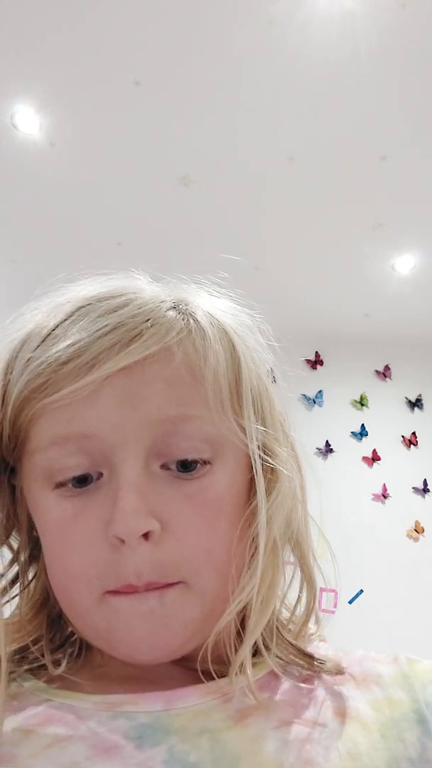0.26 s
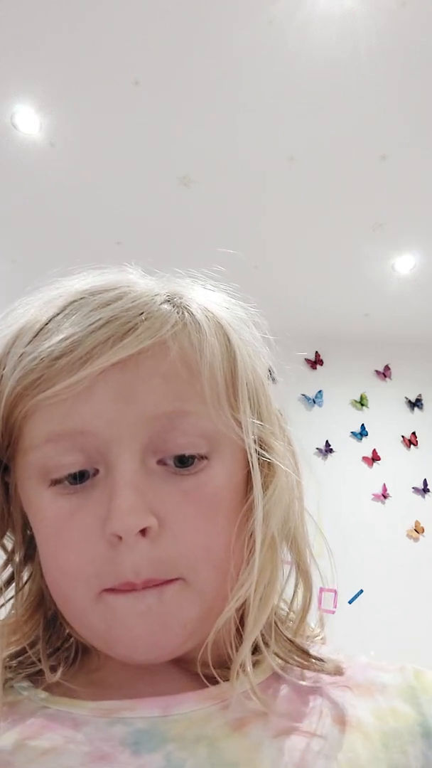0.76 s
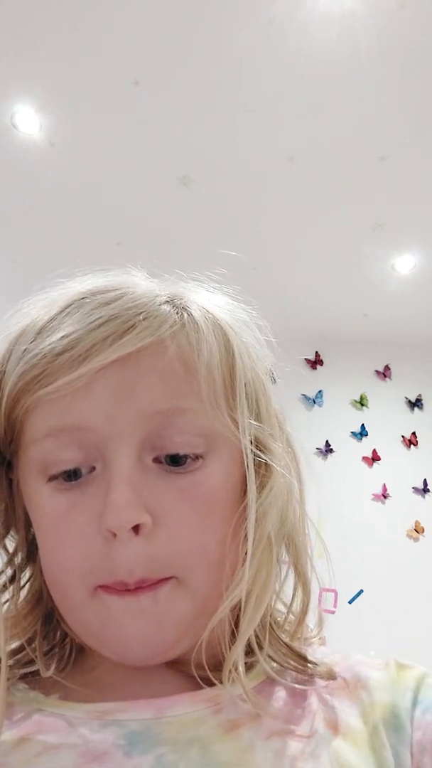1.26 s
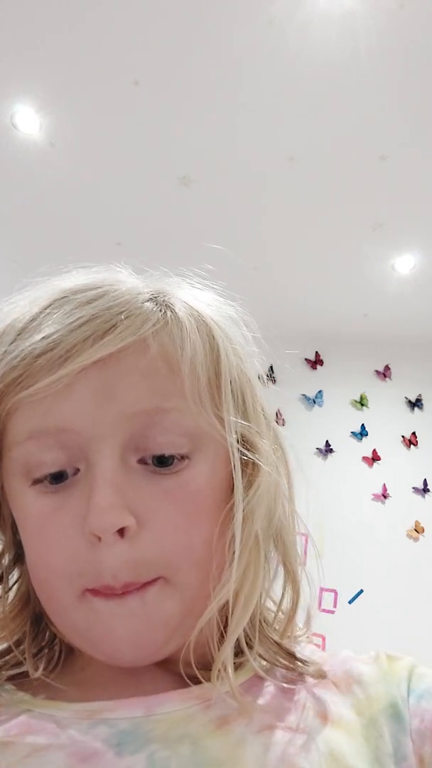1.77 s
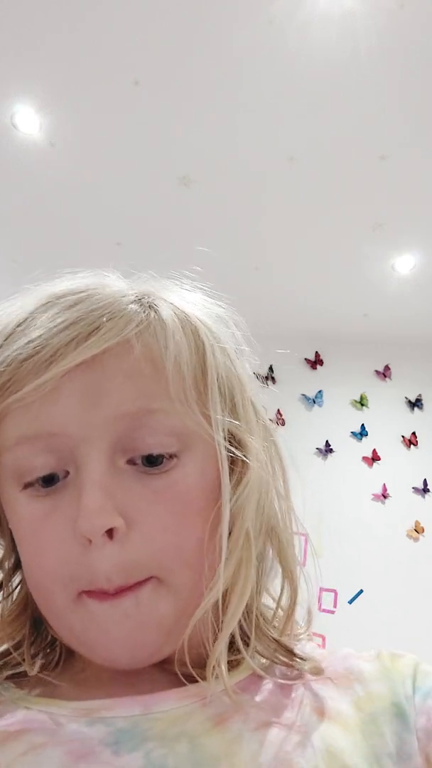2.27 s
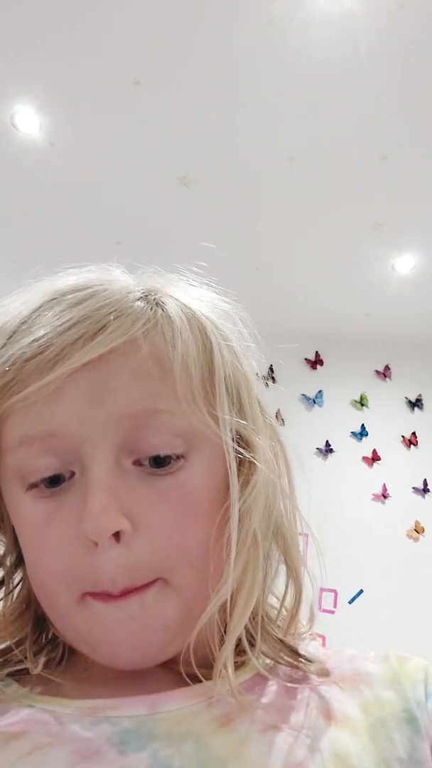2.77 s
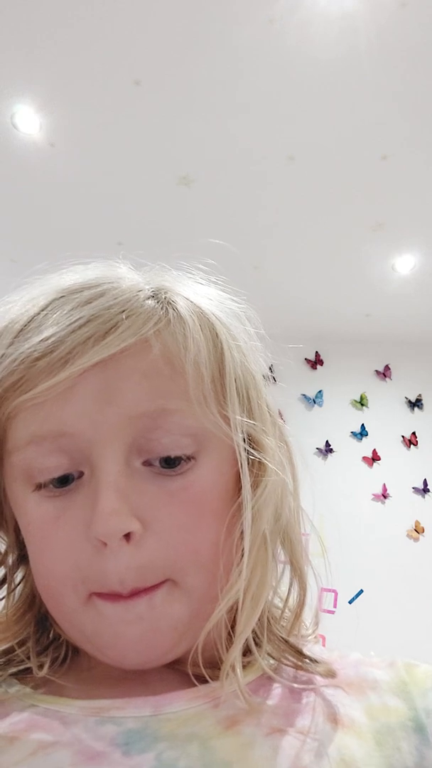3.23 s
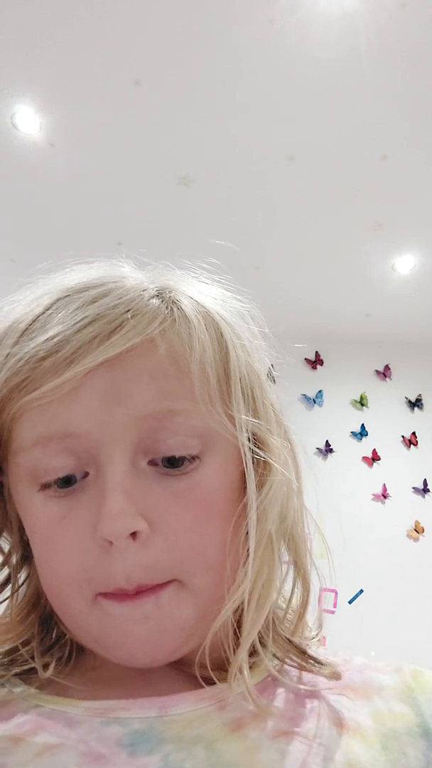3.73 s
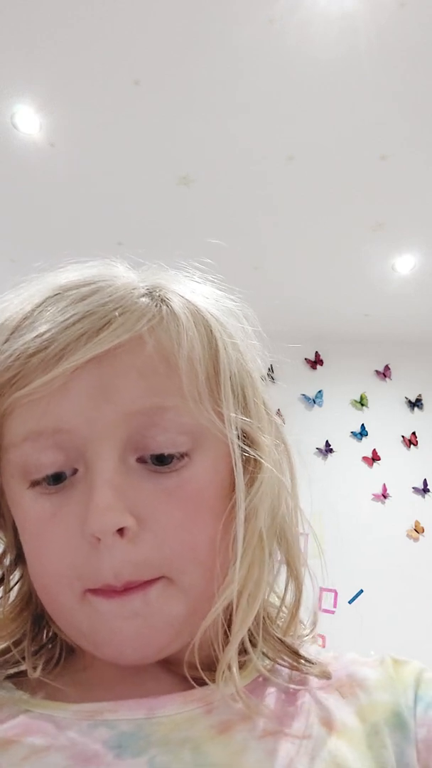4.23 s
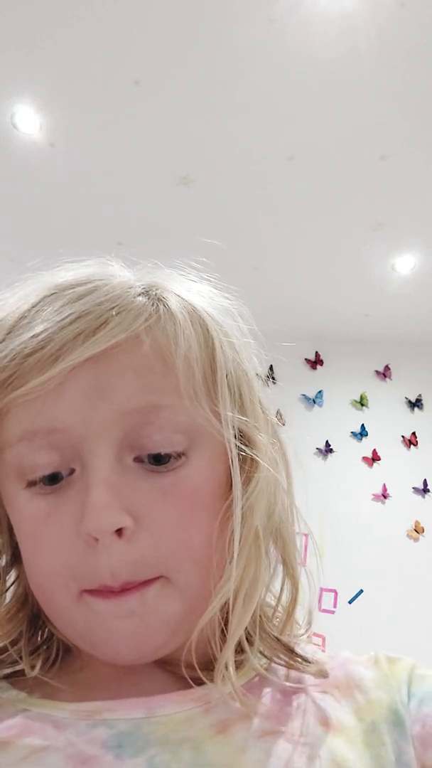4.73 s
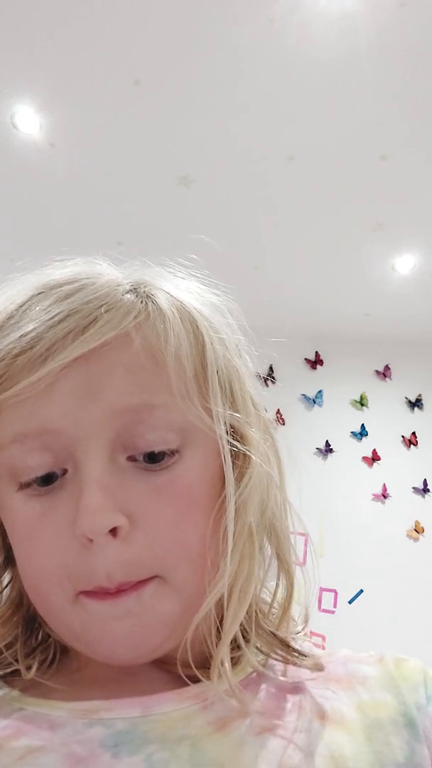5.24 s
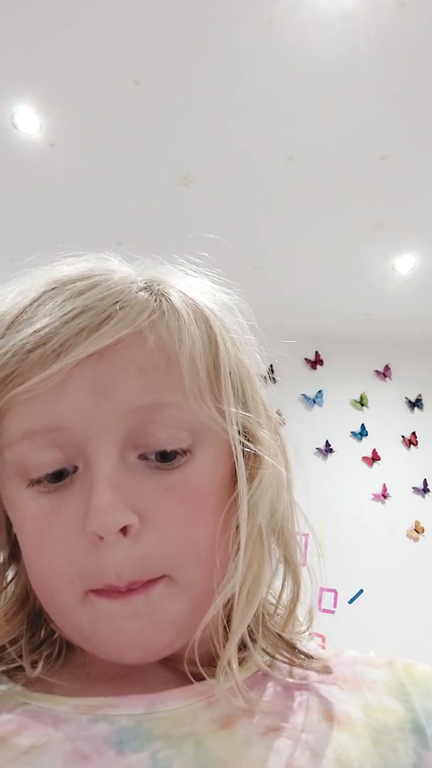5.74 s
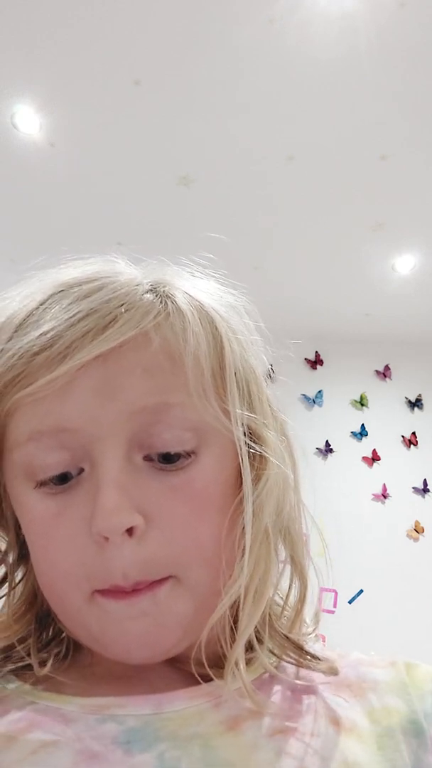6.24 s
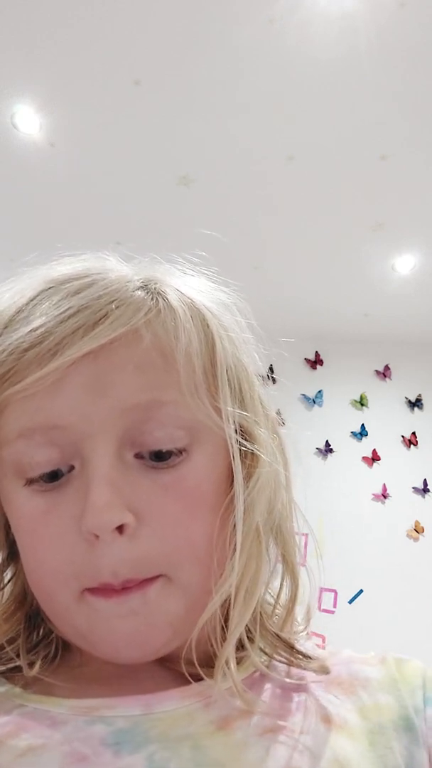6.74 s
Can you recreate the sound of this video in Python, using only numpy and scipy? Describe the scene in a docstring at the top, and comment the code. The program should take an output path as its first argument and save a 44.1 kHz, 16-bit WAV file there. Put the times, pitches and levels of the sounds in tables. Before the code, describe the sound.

Irregular rapid plastic clicks and knocks on a tabletop, strong ones roughly every half second with softer taps between, recorded very close indoors.

```python
"""Fingers rustle over a faint room tone, then small plastic toys are tapped and pressed on a table top,
close to the right port of a phone in a quiet room; the left port hears the taps later and shaded.
Each contact snaps and briefly rings the hollow shell (fading sine waves) and leaves a rattle and
some thin treble (fading noise). The table answers with a dull thud of low fading sine waves.
The rustle is swells of noise, and the room tone is steady noise."""
import sys
import numpy as np
from scipy import signal
from scipy.fft import rfft, irfft, next_fast_len
from scipy.io import wavfile
from scipy.ndimage import uniform_filter1d

SR = 44100
rng = np.random.default_rng(int(sys.argv[2]) if len(sys.argv) > 2 else 0)


def wav_record(signal):
    """Record a signal, one row per channel, as 16-bit PCM in the file named by sys.argv[1]."""
    frames = np.transpose(np.atleast_2d(signal))
    bounded = np.clip(frames, -1, 1)
    # unit amplitude maps onto the largest positive 16-bit level
    quanta = np.round(bounded * 32767).astype(np.int16)
    wavfile.write(sys.argv[1], SR, quanta)


def field_ratio(decibels):
    """Amplitude ratio for a level in dB (20 dB per decade); scalars and array-likes work."""
    return 10 ** (np.asarray(decibels, dtype=float) / 20)


N = 308700  # length of the scene in samples (7 s)

# contacts of finger, toy and table, with levels before each sound's own settings:
# start_s, snap_level_db, shell_ring_level_db, shell_pitch_hz, table_panel_level_db, table_boom_level_db
CONTACTS = [(.0231, -40.5, -40, 480, -47, -52), (0.2109, -50, -40.5, 625, -29, -31),
            (.2678, -40, -47, 1100, -45, -45), (.2712, -10.5, -11, 1150, -20, -23),
            (.435, -72, -53, 500, -53, -56), (0.7876, -32, -18.5, 450, -17, -24),
            (0.813, -18, -7, 983, -35, -35), (0.8182, -3, -5.5, 1012, -19, -21),
            (.945, -70, -52, 500, -41.5, -54), (1.229, -67, -35, 435, -42, -49),
            (1.2664, -70, -37.5, 690, -50, -55), (1.3165, -70.5, -38.5, 449, -37, -48),
            (1.3577, -44.5, -29.5, 465, -26, -23), (1.3795, -51, -21, 554, -32, -35),
            (1.4011, -4, -9, 1239, -18, -27), (1.538, -52, -36, 950, -32, -44),
            (1.719, -55, -24.5, 454, -35, -35), (1.7244, -30, -19, 1107, -17, -18),
            (1.7408, -58.5, -17, 446, -29.5, -37), (1.9414, -43, -36, 470, -38, -46),
            (1.97, -71, -51.5, 500, -37.5, -45), (2.0475, -79, -45.5, 611, -45.5, -47),
            (2.0885, -42, -24.5, 1097, -40.5, -45), (2.0955, -33.5, -13.5, 785, -15, -20),
            (2.1205, -4, -7, 1298, -14, -27), (2.198, -60, -42, 1107, -37, -51),
            (2.2475, -30, -27, 1116, -27, -36), (2.284, -70, -50, 500, -37, -39),
            (2.314, -62, -39.5, 987, -34, -54), (2.4105, -43.5, -30, 455.5, -40, -38.5),
            (2.4166, -36.5, -12, 454, -21, -21), (2.4467, -47.5, -18, 797, -32, -32),
            (2.4626, -6.5, -7.5, 1212, -11, -22), (2.6113, -52.5, -35, 733, -39, -45),
            (2.66, -72, -49, 450, -34, -45), (2.775, -64.5, -37.5, 746, -40, -40),
            (2.7902, -66.5, -34, 540, -23, -29), (2.8303, -66, -37.5, 802, -28, -30),
            (2.845, -75, -50, 500, -30, -32), (2.8834, -73.5, -37, 803, -29.5, -41),
            (2.917, -12, -5.5, 1090, -7, -11), (3.0383, -46.5, -33, 467, -36, -42),
            (3.2191, -45, -40, 603, -45, -44), (3.233, -61, -35.5, 506, -27, -31),
            (3.2699, -40, -41.5, 537, -38, -34.5), (3.2821, -9, -7.5, 763, -24, -23),
            (3.4333, -62.5, -44, 615, -49, -51), (3.462, -49, -47.5, 680, -65, -59),
            (3.5857, -60, -34.5, 650, -26, -26), (3.625, -40.5, -34, 440, -31, -17),
            (3.6401, -11.5, -7.5, 1009, -32, -30), (3.7846, -58, -37.5, 604, -39, -41),
            (4.122, -30, -31.5, 456, -36, -40), (4.13, -55, -19.5, 444, -19, -25),
            (4.1523, -6.5, -5, 1065, -18, -22), (4.17, -73, -38, 502, -14, -28),
            (4.259, -39, -28.5, 621, -34, -50), (4.295, -70.5, -54, 500, -39.5, -48),
            (4.4306, -50, -34, 915, -39, -45), (4.4369, -36, -8.5, 692, -21, -26),
            (4.462, -70, -43, 504, -12, -32), (4.6221, -42.5, -36, 450, -44.5, -50),
            (4.6379, -57.5, -25.5, 746, -28.5, -34), (4.672, -53, -39, 593, -40, -45),
            (4.7211, -33.5, -39, 590, -40, -45), (4.73, -38.5, -13, 707, -18, -23),
            (4.7565, -6.5, -5, 1084, -13, -16), (4.823, -70, -50.5, 500, -33, -42),
            (4.8805, -29.5, -23.5, 445, -23, -30), (4.95, -76, -46.5, 500, -42, -60),
            (5.0493, -40, -27, 503, -34, -40), (5.0553, -45.5, -13, 650, -14, -22),
            (5.0828, -7, -7, 850, -20, -18), (5.151, -75, -55, 500, -40, -46),
            (5.1815, -27, -17, 455, -29, -38), (5.208, -71, -44.5, 500, -31, -34),
            (5.3518, -35, -31.5, 603, -19.5, -31), (5.3652, -49, -24.5, 600, -28, -35),
            (5.3845, -7, -6.5, 1010, -6.5, -12), (5.47, -75, -55, 500, -38, -51),
            (5.5122, -48, -31.5, 476, -33, -41), (5.5609, -54, -40, 470, -44, -42),
            (5.643, -63, -38, 517, -45, -44), (5.656, -57, -28, 530, -27, -24),
            (5.702, -68, -55, 574, -42, -46), (5.7627, -54, -37.5, 640, -33.5, -39),
            (5.8934, -49.5, -31, 428, -40, -39), (5.9025, -57.5, -23.5, 560, -24, -23),
            (5.925, -57, -37, 520, -35, -38), (6.009, -24, -8.5, 836, -15, -16),
            (6.0823, -48.5, -38.5, 815, -45, -47), (6.4536, -50.5, -36.5, 1515, -25.5, -32),
            (6.4812, -5, -13.5, 1332, -16, -22), (6.491, -25, -6.5, 524, -16, -21),
            (6.5153, -39.5, -22, 530, -28, -36), (6.739, -43, -17, 785, -16, -28),
            (6.7621, -20.5, -13.5, 756.5, -28, -30), (6.7677, -4, -2, 840, -10, -12),
            (6.863, -70, -56, 500, -47, -48)]


def colour(x, points, lag_s=0.):
    """Shape the tone by points of (pitch_hz, level_db) and delay the sound by lag_s."""
    size = next_fast_len(N + 4096)
    hz = np.fft.rfftfreq(size, 1 / SR) + 1e-3  # just above 0, so that the logarithm exists
    point_hz, point_db = np.array(points, float).T
    gain = field_ratio(np.interp(np.log(hz), np.log(point_hz), point_db))
    delay = np.exp(-2j * np.pi * hz * lag_s)
    return irfft(rfft(x, size) * gain * delay, size)[..., :N]


def unit(x):
    """Scale to an average strength (rms) of 1."""
    return x / np.sqrt(np.mean(x ** 2))


def band_noise(hz, width_hz):
    """Two unrelated noises, one for each port, in one steep band around hz."""
    edges = [max(hz - width_hz / 2, 20), min(hz + width_hz / 2, SR / 2.1)]
    band = signal.butter(3, edges, "band", fs=SR, output="sos")
    return unit(signal.sosfilt(band, rng.standard_normal((2, N))))


def fading(times, db, t60, rise):
    """Loudness curve that rises fast at each event and falls by 60 dB in t60 seconds."""
    kicks = np.zeros(N)
    np.add.at(kicks, (times * SR).astype(int), field_ratio(db) ** 2)
    fall = 10 ** (-6 / (abs(t60) * SR))
    up = np.exp(-1 / (abs(rise) * SR))
    power = signal.lfilter([1], [1, -fall], kicks)
    return np.sqrt(signal.lfilter([1 - up], [1, -up], power))


def ring(t, hz, t60, rise, glide=0., phase=0.):
    """A damped mode; bending waves bring the high pitch first, so it may start sharp."""
    turns = hz * (t + glide * 0.0016 * (1 - np.exp(-t / 0.0011)))
    onset = (1 - np.exp(-t / abs(rise))) ** 2
    decay = 1000. ** (-t / abs(t60))
    return np.sin(2 * np.pi * turns + phase) * onset * decay


def add(out, s, x):
    """Mix x into out from time s in seconds."""
    i = int(s * SR)
    out[i:i + len(x)] += x[:N - i]


def room():
    """Faint steady noise of the room, partly alike at both ports, most of all in the bass."""
    # tone of the room noise: pitch_hz, level_db (per Hz, before scaling)
    room_tone = [(18, -25.5), (30, -10.5), (117, -2.5), (344, -4.5), (436, -0.5), (629, -14), (983, -15),
                 (4050, -21.5), (4870, -30), (8670, -27.5), (15800, -21)]
    common = rng.standard_normal(N)
    own = rng.standard_normal((2, N))
    alike = colour(common, [(200, 0.5), (1500, -10.5)]) + colour(own, [(200, -2.0), (1500, -3.5)])
    port_db = np.array([[-74.5], [-69]])  # far port, near port
    return unit(colour(alike, room_tone)) * field_ratio(port_db)


def fingers():
    """Fingers sliding on plastic make short swells of friction noise; a faster slide hisses more."""
    # slides: start_s, length_s, level_db
    slides = [(0.0, 0.098, -51.5), (.36, 0.14, -70), (0.423, 0.033, -68), (0.915, 0.067, -55.5),
              (1.162, 0.26, -62), (1.525, .074, -55), (1.628, 0.088, -59.5), (1.908, 0.18, -65.5),
              (2.26, 0.087, -57.5), (2.476, 0.1, -59), (2.565, .17, -50.5), (2.842, 0.22, -55.5),
              (3.02, 0.059, -58), (3.419, 0.068, -57), (3.766, .042, -62.5), (4.03, .36, -54),
              (4.363, 0.072, -64), (3.161, .056, -72), (6.11, .14, -72), (4.247, .078, -48.5),
              (4.616, .14, -58.5), (4.865, 0.041, -46.5), (5.154, 0.1, -54), (5.502, 0.083, -52),
              (5.62, .11, -61), (5.755, 0.053, -49.5), (5.907, 0.15, -62), (6.045, 0.056, -54),
              (6.528, 0.05, -50.5), (6.817, 0.046, -47), (6.835, .11, -70.5)]
    # tone of the body of the rustle: pitch_hz, level_db (before scaling)
    rustle_tone = [(200, -10), (500, 12), (1000, 3), (1700, -0.5), (2600, -6), (4300, -20.5), (5500, -25),
                   (7000, -38.5)]
    # hiss compared with the body for a 0.1 s slide; longer slides are slower and duller
    hiss_under_body_db, hiss_db_per_doubling = -19, -3.5
    body, hiss = np.zeros(N), np.zeros(N)
    for s, length, body_db in slides:
        hiss_db = body_db + hiss_under_body_db + hiss_db_per_doubling * np.log2(10 * length)
        swell = np.hanning(int(length * SR)) ** .8
        add(body, s, field_ratio(body_db) * swell)
        add(hiss, s, field_ratio(hiss_db) * swell)
    soft = unit(colour(rng.standard_normal((2, N)), rustle_tone))
    bright = band_noise(5400, 2200) + field_ratio(-9) * band_noise(10000, 7000)
    # the skin catches and lets go, so the level wanders by 3.6 dB (rms)
    wander = unit(uniform_filter1d(rng.standard_normal(N), size=300))
    return field_ratio(3.6 * wander) * (soft * body + bright * hiss)


def table():
    """Every blow lands elsewhere, so it stirs the modes in other shares; a weak second blow follows."""
    # modes of the table panel: pitch_hz, level_db, share of the blow's t60
    panel = [(148.4, -4, 0.57), (176.1, -6.5, .9), (207.2, -2, 0.92), (256.8, -6, .8), (327, -6.5, 0.66),
             (432.1, -9, .55)]
    # deeper modes of the table: pitch_hz, level_db, share of the blow's t60
    boom = [(58.2, -7.5, 0.95), (71.6, -2.5, 1.1), (86, -6, 1.1), (103.6, -5.5, 0.99), (126.2, -6, .95)]
    coarse = 8  # the table holds only bass, so it is computed on every eighth sample
    blow_lag_s = -.002  # the push starts just before the snap
    blow_t60_s, soft_t60_s_per_db = 0.13, 0.0022  # soft blows ring a little longer
    settle_s, settle_db, settle_scatter_db = .07, -30, 3  # typical delay, level under the blow
    out = np.zeros(N // coarse + SR)
    t = np.arange(0, SR // 3, coarse) / SR
    start = np.transpose(CONTACTS)[0]
    force = np.array(CONTACTS)[:, -2:]
    # the toy rocks back once
    rock = rng.standard_normal((len(start), 2)).T
    start = np.r_[start + blow_lag_s, start + settle_s * np.exp(.3 * rock[0])]
    force = np.r_[force, force + settle_db + settle_scatter_db * rock[1][:, None]]
    modes = panel + boom
    chance = rng.standard_normal((len(start), len(modes), 3))  # level, pitch and phase of each mode
    for s, (panel_db, boom_db), c in zip(start, force, chance):
        levels = [panel_db] * len(panel) + [boom_db] * len(boom)
        t60 = blow_t60_s - soft_t60_s_per_db * panel_db
        i = int(s * SR / coarse)
        for (hz, db, share), blow_db, (g, f, p) in zip(modes, levels, c):
            mode = ring(t, hz * (1 + .05 * f), t60 * share, 0.0033, phase=1.49 * p)
            out[i:i + len(t)] += field_ratio(blow_db + db + 2.8 * g) * mode
    return signal.resample_poly(out, coarse, 1)[:N]


def shells():
    """Each contact snaps through stiff modes and briefly rings the hollow shell."""
    # upper stiff modes of a snap: pitch_hz, level_db, t60_s
    snap_modes = [(2090, -1.5, 0.0056), (2810, -7.5, 0.004), (3700, -11.5, 0.0067), (4700, -15.5, 0.0057)]
    upper_spread = .09  # random part by which the upper modes shift in pitch
    snap_hz, snap_scatter_octaves = 1460, 0.067  # lowest stiff mode before its shifts
    # light contacts, which ring the shell less than this, have a higher snap pitch
    light_db, light_octaves = -24, .65
    out = np.zeros(N)
    t = np.arange(SR // 16) / SR
    chance = rng.standard_normal((len(CONTACTS), 3 + len(snap_modes)))
    for (s, snap_db, ring_db, hz, _, _), c in zip(CONTACTS, chance):
        lightness = 1 / (1 + np.exp((ring_db - light_db) / 2))
        low_hz = snap_hz * 2 ** (light_octaves * lightness + snap_scatter_octaves * c[2])
        snap = field_ratio(4.0) * ring(t, low_hz, 0.0088, 0.00011, glide=0.12)
        for (f, db, t60), d in zip(snap_modes, c[3:]):
            snap += field_ratio(db) * ring(t, f * (1 + upper_spread * d), t60, 0.00026)
        shell = ring(t, hz, 0.022, 0.00015, glide=.25)
        lower_hz = hz * (0.74 + 0.071 * c[0])
        shell += field_ratio(-4.5) * ring(t, lower_hz, .04, 0.00038, phase=c[1])
        add(out, s, field_ratio(snap_db) * snap + field_ratio(ring_db + 1.0) * shell)
    return -out


def tail_level():
    """Times of the contacts and base levels of their bright tails, which follow snap and ring."""
    s, snap_db, ring_db = np.transpose(CONTACTS)[:3]
    return s, -26.5 + 0.47 * snap_db + 0.14 * ring_db


def rattle():
    """Loose parts and near echoes smear each contact; the room holds a little of it longer."""
    # dull rattle: pitch_hz, width_hz, level_db compared with the ring, t60_s
    dull_bands = [(240, 120, -18.5, 0.17), (603, 455, -11.5, 0.11), (1150, 600, -15, 0.094)]
    # bright tail: pitch_hz, width_hz, level_db compared with the tail's base level, t60_s
    bright_bands = [(1940, 970, 2.5, 0.071), (2410, 2200, -12, 0.051), (4160, 2200, -18, 0.057),
                    (1500, 1400, -11.5, 0.31), (2540, 2300, -23, 0.32), (4052, 2200, -23.5, 0.14)]
    s, tail_db = tail_level()
    ring_db = np.transpose(CONTACTS)[2]
    dull = sum(band_noise(hz, width) * fading(s, ring_db + db, t60, 0.0033)
               for hz, width, db, t60 in dull_bands)
    bright = sum(band_noise(hz, width) * fading(s, tail_db + db, t60, 0.00092)
                 for hz, width, db, t60 in bright_bands)
    return dull + bright


def fizz():
    """Thin treble of each contact that travels through the air: a short burst and a longer tail."""
    s, tail_db = tail_level()
    snap_db = np.transpose(CONTACTS)[1]
    air = band_noise(11500, 8000) + field_ratio(-0.5) * band_noise(6800, 2400)
    return air * (fading(s, snap_db - 50, 0.011, 0.00091) + fading(s, tail_db - 28, 0.087, 0.0036))


def scene():
    """The near port hears it all; the far one later, shaded, and with some scatter of its own."""
    # steep loss of treble above about 5 kHz in the knocks and rattle: pitch_hz, level_db
    knock_tone = [(5200, 0.06), (6200, -15.5), (9000, -30.5)]
    # the far port, in the shadow of the phone: pitch_hz, level_db
    shadow_tone = [(40, -13), (100, -11), (200, -9), (400, -19.5), (750, -27), (1400, -10), (2800, -15),
                   (5500, -25), (10000, -14)]
    diffuse = colour(rattle(), knock_tone) + fingers() + fizz()
    near = colour(shells() + table(), knock_tone) + diffuse[0]
    far = colour(near, shadow_tone, lag_s=.00034) + field_ratio(-11.0) * diffuse[1]
    return np.array([far, near]) + room()  # left, right


def low_pass(x):
    """Removes everything above the highest recorded frequency."""
    return signal.sosfilt(signal.butter(12, 16000, fs=SR, output="sos"), x)


def record(dry):
    """The phone cuts the deep bass, clips the hardest taps and shuts off the top."""
    bass_cut = signal.butter(4, 52, "high", fs=SR, output="sos")
    top_cut = signal.ellip(8, .2, 60, 15750, fs=SR, output="sos")
    x = signal.sosfilt(bass_cut, dry)
    x = signal.sosfilt(top_cut, np.clip(x, -1, 1))
    x = colour(x, [(9000, 0.27), (13000, -3.5), (15700, -9.0)])
    return low_pass(x)


dry = scene()
out = record(dry)
wav_record(out)
```